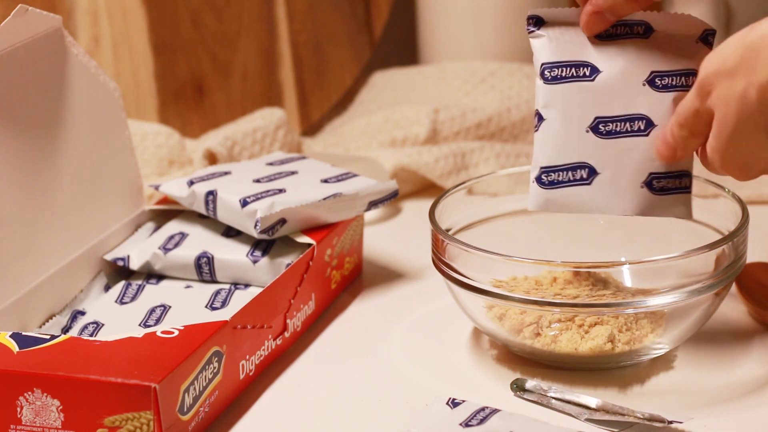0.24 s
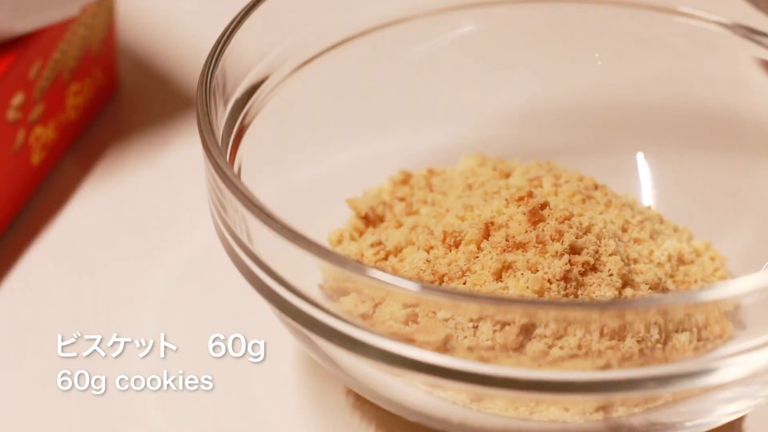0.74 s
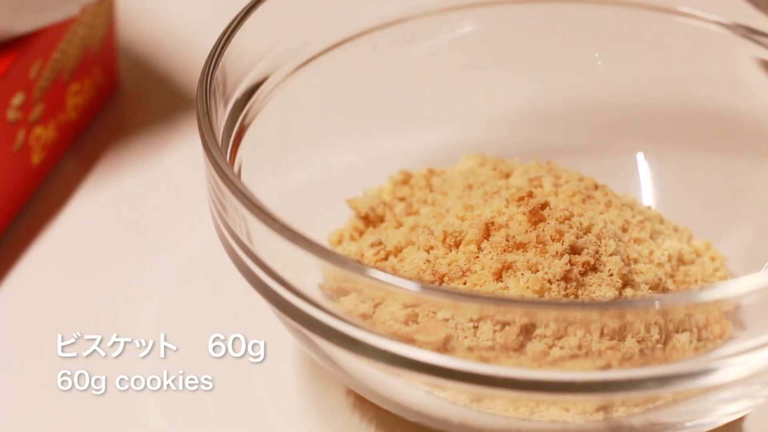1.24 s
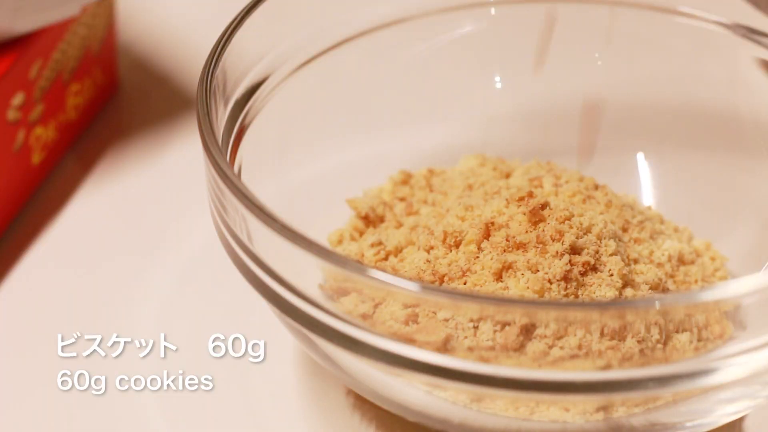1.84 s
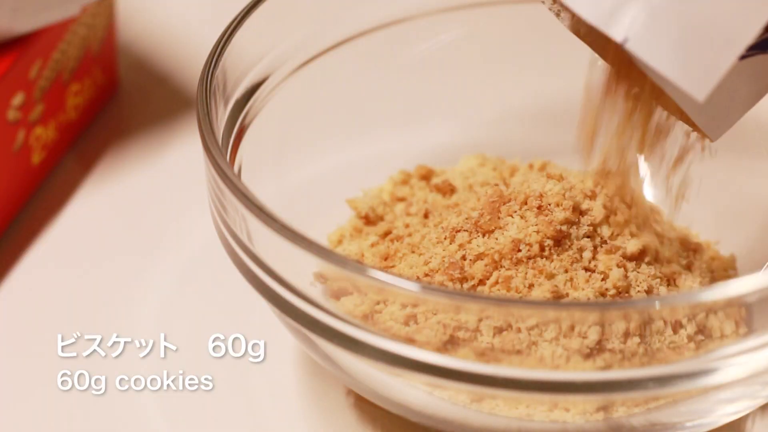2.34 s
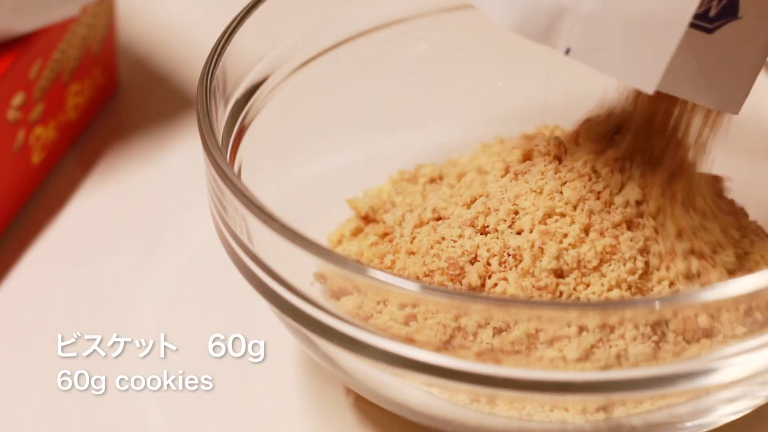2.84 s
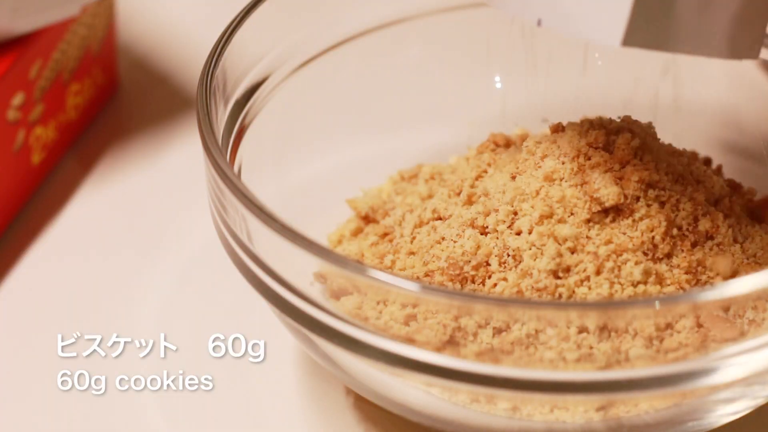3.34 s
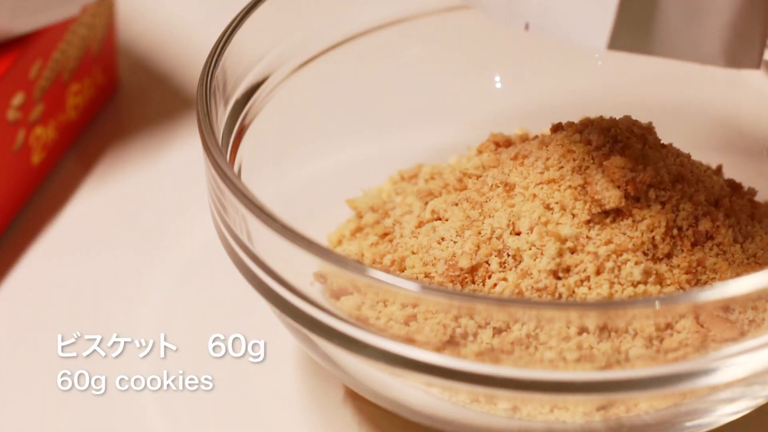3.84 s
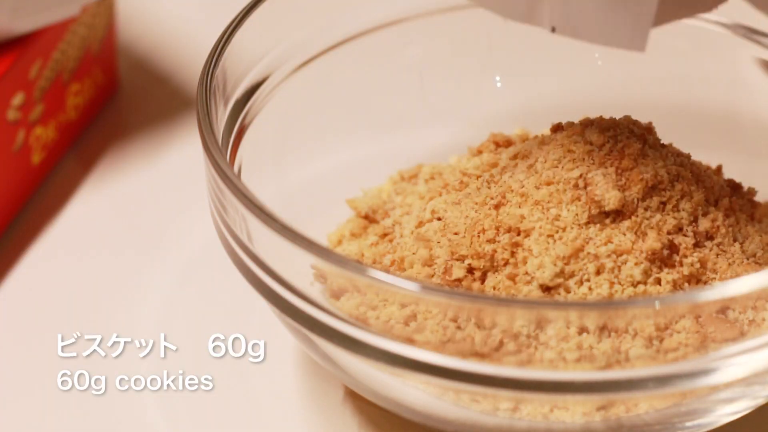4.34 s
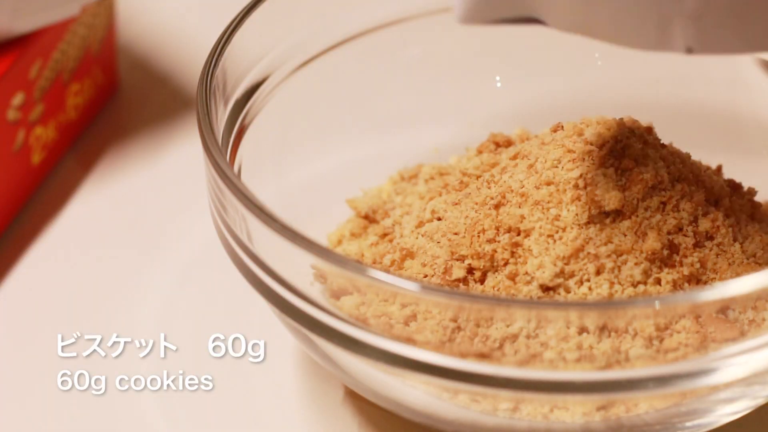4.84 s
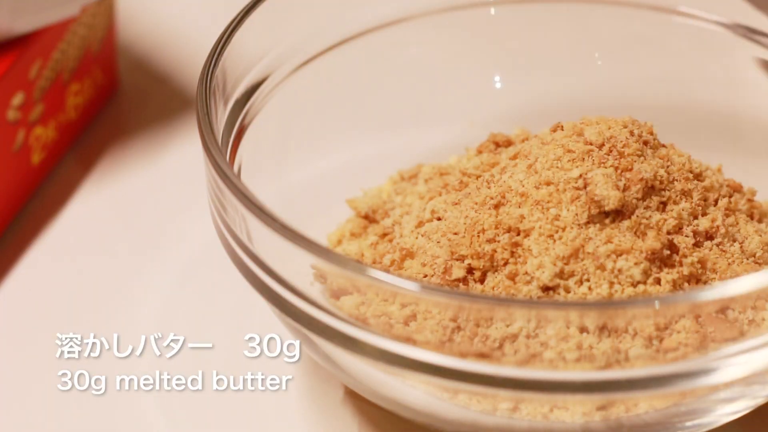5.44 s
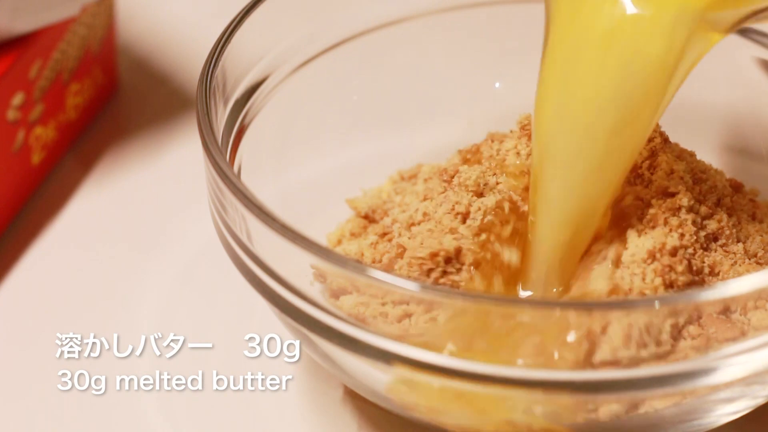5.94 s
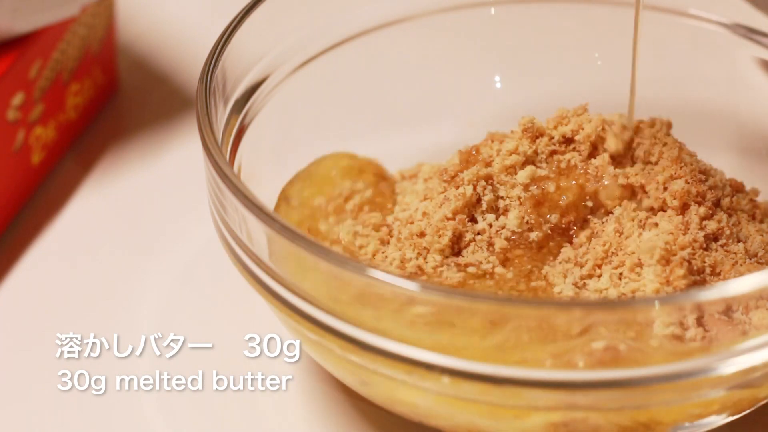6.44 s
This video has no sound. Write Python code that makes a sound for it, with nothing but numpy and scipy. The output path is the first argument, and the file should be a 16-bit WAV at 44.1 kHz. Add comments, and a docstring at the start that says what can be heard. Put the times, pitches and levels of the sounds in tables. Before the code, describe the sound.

Close up in a quiet kitchen, dry biscuit crumbs hiss out of a crinkling paper packet in short bursts, with sharp little snaps and dull finger taps. A stray crumb faintly pings a glass bowl before one fuller pour rises and fades. The packet is shaken again and gives a loud crunch, then goes still. Two tiny glass pings leave only faint room hiss and appliance hum in stereo.

```python
"""Biscuit crumbs pour from a crinkly paper packet into a glass bowl, close up and in stereo.
For two seconds the packet is shaken and squeezed: folds snap, fingers knock, crumbs slide in spurts.
A stray crumb pings the glass, then a long pour swells to its peak near 2.8 s and thins out.
More shakes follow, with a hard crunch near 4.7 s; the packet settles and two last crumbs ping at 6 s.
A quiet kitchen hisses and hums under it all and is left alone at the end."""
import sys
import numpy as np
from scipy import signal
from scipy.fft import rfft, irfft, next_fast_len
from scipy.io import wavfile
from scipy.ndimage import uniform_filter1d, map_coordinates

SR = 44100
rng = np.random.default_rng(int(sys.argv[2]) if len(sys.argv) > 2 else 0)


def dump_mix(stems):
    """Bounce the given channels to the path in sys.argv[1] as a 16-bit WAV at rate SR."""
    frames = np.atleast_2d(stems).T  # one column per channel
    limited = np.clip(frames, -1, 1)  # hard clip at full scale
    pcm = np.round(limited * 32767).astype(np.int16)
    wavfile.write(sys.argv[1], SR, pcm)


N = 295590

# each shake or squeeze lets crumbs slide: (peak time [s], crumb flow [dB], swell [s per 20 dB],
# fade [s per 20 dB], rustle over flow [dB], treble over flow [dB])
PACKET_SHAKES = [(0.03, -43, 0.5, 0.18, -10.5, -5.5), (0.145, -52, 0.4, 0.06, -10, -2.5),
                 (0.222, -47.5, .015, .1, -18, -3), (0.252, -46.5, .06, .015, -19, -3),
                 (0.334, -51.5, .015, 0.09, -3, -5), (0.374, -48, .09, .015, -14, -3),
                 (0.52, -62.5, .5, .2, -6, -8), (0.622, -37, 0.0123, 0.01, -8.5, 4),
                 (0.805, -53, .02, 0.22, -6, -5.5), (0.866, -41.5, .06, 0.06, -27, -6),
                 (0.966, -41, 0.12, 0.11, -23.5, -7), (1.06, -50, 0.08, 0.16, -13, -4.5),
                 (1.141, -38.5, 0.04, 0.11, -25, -16), (1.25, -52, 0.23, .08, -11.5, -5),
                 (1.365, -55, 0.1, 0.1, -13.5, -3.5), (1.514, -46, 0.11, 0.12, -6.5, -5),
                 (1.69, -61, 0.6, .4, -10, -6), (1.774, -49, .01, .14, -2.5, -1),
                 (1.92, -52, 0.28, .3, -15, -2), (2.015, -51, .3, 0.16, -4, -1),
                 (2.447, -54, .01, .07, 2, 2), (3.19, -51, 0.03, 0.09, -4, 1),
                 (3.262, -43, 0.04, .12, -10, -3), (3.541, -51, .025, 0.11, -1.5, -12),
                 (3.625, -42, 0.12, 0.145, -15, -2.5), (3.825, -56, 0.04, 0.02, -1.5, -6),
                 (3.855, -52.5, 0.04, .05, -2.5, -9), (3.922, -39.5, 0.0355, 0.1238, -11, -9.5),
                 (4.041, -38.5, 0.04, 0.085, -13.5, -8), (4.14, -51, .03, 0.1953, -9, -5),
                 (4.255, -43, .07, 0.0652, -17, -2), (4.304, -41.5, 0.11, 0.0245, -18.5, -4.5),
                 (4.406, -59, .15, 0.04, -11.5, -11), (4.666, -30, .006, .085, -7, -11),
                 (4.79, -54.5, 0.02, 0.12, -5.5, -7), (4.951, -37, .004, .055, -14, -6.5),
                 (5.03, -63, 0.1, 0.1, -7, -8), (5.15, -54, 0.12, 0.04, -18, -10),
                 (5.187, -62.5, 0.06, 0.04, 5, -12), (5.3, -54, .025, .1, -13, -6),
                 (5.335, -52, 0.07, .05, -12.5, -6.5), (5.396, -46, 0.06, .017, -16, -18),
                 (5.43, -70, 0.3, 0.04, -6, -8)]
# envelope of the long pour: (time [s], crumb flow [dB], rustle over flow [dB])
LONG_POUR = [(2.1, -70, -13), (2.243, -62, -9), (2.424, -53, -12.5), (2.514, -47.5, -16.5),
             (2.67, -38.5, -18), (2.834, -35.5, -13), (3.035, -39.5, -10), (3.129, -54.5, 2),
             (3.26, -51, -4.5), (3.514, -72, 5)]
# tone colour of sliding crumbs: (frequency [Hz], relative level [dB])
CRUMB_SPECTRUM = [(710, -33.5), (1200, -11), (1340, -22.5), (2180, -6), (2620, -9.5), (2980, -4.5),
                  (3590, -7.5), (4220, -0.5), (5970, -8.5), (9720, 5.5), (11600, -3.5), (13200, -4.5),
                  (16000, -19)]
# tone colour of rustling paper: (frequency [Hz], relative level [dB])
RUSTLE_SPECTRUM = [(120, -41), (230, -15.5), (460, -11.5), (680, -9), (870, -12.5), (1150, -4.5),
                   (1400, -10), (2200, -8), (4000, -9.5), (8000, -59.5)]
# stereo image of crumbs and paper: (frequency [Hz], left-right likeness [-1..1])
CLOSE_IMAGE = [(60, -0.27), (150, -0.24), (380, 0.22), (950, 0.79), (2380, 0.98), (5980, 0.8),
               (10000, 0.85), (15000, 0.3)]
# the big folds that give way: (time [s], panel peak [dB], panel pitch [Hz],
# air pocket over panel [dB], crisp edge over panel [dB], rattle t60 [s])
FOLD_SNAPS = [(0.0155, -23, 3980, -28, -14.5, .01), (0.1082, -46, 1450, 0, -6.5, 0.0048),
              (0.1154, -37, 4040, -10, -8.5, .0042), (0.139, -42, 4050, -27, 8.5, .012),
              (0.3316, -41, 3070, -1.5, -5, 0.01), (0.4344, -45.5, 4070, -25, 2.5, .014),
              (0.4782, -48.5, 4080, -6, 0, 0.013), (0.5134, -51.5, 4050, -13, 9.5, .0061),
              (0.6215, -24.5, 3800, -36, 0, 0.0094), (0.7926, -54, 1840, -30, 8, .0034),
              (0.8677, -43.5, 4324, -37, 9.5, .0054), (0.9652, -35.5, 4870, -30, -11, .015),
              (1.034, -35, 2310, -21, -14, 0.0065), (1.1339, -17, 4040, -38, -15, .006),
              (1.1874, -21.5, 3100, -24, -28, .002), (1.2724, -45.5, 1480, -28, -10.5, .0062),
              (1.3393, -38, 2905, -4.5, -6, 0.016), (1.4071, -46, 2250, -7, -8.5, 0.0046),
              (1.4175, -47, 1700, -6, -12, .005), (1.4945, -41, 2900, -15, -5, .005),
              (1.51, -33.5, 1650, -4, -6, .005), (1.5274, -33, 3740, -16, -15, .005),
              (1.5349, -41.5, 1710, -2, -13, .005), (1.5668, -39.5, 1500, 2.5, -8, .014),
              (1.7745, -39, 4584, 0, -15, 0.0062), (1.7984, -41, 4800, -6, -9, .0055),
              (1.8198, -33.5, 4180, -19, -17.5, .0054), (1.8801, -41.5, 4490, -18, -3, .0073),
              (1.9749, -37.5, 2170, -17, 0, .005), (2.012, -42, 1570, -9.5, -2.5, .0045),
              (2.022, -42.5, 2600, -0.5, -5.5, 0.0096), (2.0553, -31, 3370, -24, -14, 0.0091),
              (2.3712, -52, 4190, 1.5, -9, .0081), (2.451, -37, 3100, -7, -10, 0.017),
              (2.7544, -43, 3030, 6, -11, .0046), (2.8328, -25.5, 3160, -16, -6, .0034),
              (2.8704, -28.5, 4270, -8, -6.5, 0.0076), (2.92, -28.5, 4200, -36.5, -21, .0019),
              (3.0939, -27, 3180, -13, -17, .004), (3.117, -31, 2210, -19, -25, 0.0069),
              (3.1383, -40.5, 2270, -18, -11.5, .005), (3.1845, -24, 3970, -15.5, -16.5, 0.0043),
              (3.21, -35.5, 4180, -30, -14, 0.015), (3.2515, -25, 3630, -8, 11, .005),
              (3.2954, -30.5, 2130, -38, -27, 0.003), (3.3318, -33.5, 4170, -16.5, -6.5, 0.0051),
              (3.4079, -37, 4010, -37, -21, .0082), (3.4902, -41.5, 1910, -14, -25, .0031),
              (3.534, -24, 2100, -18.5, -3, .0017), (3.5505, -25.5, 3050, -31.5, -13, 0.0094),
              (3.61, -31, 3360, -40, -4.5, 0.01), (3.8228, -36, 1910, -10, -4, .0041),
              (3.8506, -26, 2230, -38, -6.5, 0.013), (3.917, -27.5, 2380, -21, 2.5, .015),
              (3.9421, -33.5, 2200, -40, -23, 0.0071), (3.994, -33.5, 2250, -22, 2.5, 0.0064),
              (4.0352, -28.5, 2520, -10.5, -7, .0078), (4.098, -43.5, 1580, -3.5, -2, .0046),
              (4.1343, -35.5, 3900, -10, -2.5, .0079), (4.2457, -36.5, 4770, -20, -3.5, 0.0079),
              (4.2902, -37, 4680, -13, -15, .005), (4.366, -52, 4410, -21, 5, .005),
              (4.4007, -46, 3040, -24, -21, .0046), (4.6638, -25, 4030, -21, -8.5, 0.012),
              (4.6756, -18, 2370, -12, -11, .005), (4.6795, -17, 4360, -22, 0, 0.016),
              (4.6914, -25.5, 2550, -16, 6.5, 0.0087), (4.7167, -27, 3960, -23, -19.5, 0.0032),
              (4.7619, -44, 4010, -15, 10, .0058), (4.785, -47, 2210, -1.5, -10, .0083),
              (4.8314, -43, 2980, -22, -26.5, .005), (4.9546, -29.5, 3800, -25.5, -4, .0069),
              (4.9672, -23, 4300, -21.5, -1.5, 0.011), (5.2383, -52, 2400, -5.5, -26, 0.0071),
              (5.3394, -47, 4040, -10.5, -14, .013), (5.3936, -43, 2750, -14.5, -22, .0097),
              (5.4944, -55, 3900, -15, -12, .005), (6.1494, -64, 4420, -20, 6, 0.0057)]
# the crisp edge of every snap: (frequency [Hz], relative level [dB], t60 [s])
CRISP_MODES = [(8780, 10, 0.0026), (10130, 0.5, 0.0036)]
# how the packet is held: (time [s], air pocket pitch [Hz], left over right [dB])
PACKET_GRIP = [(0.1, 785, -1), (0.33, 1160, 1.5), (0.62, 1100, 1), (0.9, 1390, 5), (1.35, 1370, 1),
               (1.5, 1145, -1.5), (3.0, 1150, -2), (3.4, 1170, -2), (3.85, 850, 0), (4.05, 1113, -0.5),
               (4.68, 857, 0), (4.8, 480, 2.5), (4.97, 705, 0), (5.2, 930, -3.5)]
# fingers tap and press the packet: (time [s], peak level [dB], pitch [Hz])
FINGER_KNOCKS = [(0.014, -48, 595), (0.104, -47, 600), (0.258, -53, 580), (0.329, -50, 547),
                 (0.396, -56, 517), (1.507, -47, 676), (1.566, -48.5, 595), (1.777, -49, 704),
                 (2.449, -51.5, 490), (2.829, -48.5, 500), (3.089, -42.5, 390), (3.329, -51, 510),
                 (3.917, -52, 503), (4.036, -50.5, 400), (4.673, -34, 450), (4.683, -44, 250),
                 (4.955, -48, 450), (4.968, -47, 470), (5.187, -52.5, 600)]
# crumbs that strike bare glass: (time [s], low mode gain [dB], high mode gain [dB])
GLASS_PINGS = [(2.069, -70, -62), (3.776, -90.5, -64), (5.955, -94.5, -71.5), (5.977, -68, -74)]
# the ring of the glass bowl: (frequency [Hz], relative level [dB], t60 [s])
BOWL_MODES = [(2500, -1.5, 0.4), (4390, -3, 0.5), (9028, -7, .25), (12080, -19, .2), (12800, 2, 0.12),
              (13500, -7, 0.33), (14300, -8, 0.22)]
# reverb decay off the kitchen walls: (frequency [Hz], t60 [s])
WALL_DECAY = [(300, 0.45), (12000, 0.027)]
# tone colour of the room hiss: (frequency [Hz], relative level [dB])
ROOM_SPECTRUM = [(12, -36), (28, -14), (50, -15.5), (66, -12), (85, -17), (110, -13), (170, -17),
                 (400, -25.5), (825, -29.5), (2750, -33.5), (7000, -37), (8500, -33), (12000, -38),
                 (16000, -38.5)]
# stereo image of the room hiss: (frequency [Hz], left-right likeness [-1..1])
ROOM_IMAGE = [(30, .6), (150, .5), (400, 0.29), (3000, 0.25), (15000, 0.1)]
# appliance hum and whine: (frequency [Hz], left level [dB], right level [dB], left phase lead [rad])
HUM_TONES = [(49.7, -82, -75, .3), (90, -75, -56.5, 1.7), (122, -82, -81, .3), (8465, -98, -96, .3)]


def pouring(flow, bright, rustle):
    """Crumbs hiss as they slide; the paper under them rustles lower and in coarser clumps."""
    # a thin trickle lets single crumbs stand out
    sparse_db = np.interp(20 * np.log10(flow + 1e-12), [-55, -40], [2.9, 1.7])
    fine = grains(clump_db=2, clumps_per_s=250, spike_db=sparse_db, patch_db=2.5)
    fine /= np.sqrt(uniform_filter1d(np.mean(fine ** 2, axis=0), size=SR // 5))  # ride the level flat
    hiss = spread(fine * amp(1.1 * wobble(30) + 1.5 * wobble(16)), CRUMB_SPECTRUM, CLOSE_IMAGE)
    treble = filtered(hiss, lambda hz: 1 / (1 + (6000 / (hz + 1)) ** 8))
    coarse = grains(clump_db=3, clumps_per_s=150, spike_db=2.2, patch_db=3) * amp(1.2 * wobble(25))
    paper = spread(coarse, RUSTLE_SPECTRUM, CLOSE_IMAGE)
    return flow * (hiss - treble) + bright * treble + rustle * paper


def grains(clump_db, clumps_per_s, spike_db, patch_db):
    """A dense hail of tiny impacts in clumps; a few are bigger than the rest."""
    spikes = np.minimum(rng.exponential(size=N), 6)
    size = amp(spike_db * spikes + clump_db * wobble(clumps_per_s))
    return size * patchy(rng.standard_normal((2, N)), patch_db)


def handling(pour_treble_db=-4):
    """Envelopes of crumb flow, its treble and the rustle: shakes swell and fade over the long pour."""
    t = np.arange(N) / SR
    times, flow_db, rustle_db = np.transpose(LONG_POUR)
    flow_db = np.interp(t, times, flow_db, left=-200, right=-200)
    rustle_db = np.interp(t, times, rustle_db)
    power = amp([flow_db, flow_db + pour_treble_db, flow_db + rustle_db]) ** 2
    for peak_s, db, swell, fade, paper_db, treble_db in PACKET_SHAKES:
        shape_db = db - 20 * np.maximum((peak_s - t) / swell, (t - peak_s) / fade)
        power += amp(shape_db + np.array([[0], [treble_db], [paper_db]])) ** 2
    return np.sqrt(power)


def snaps(folds, pan_scatter_db=1.3):
    """Each fold breaks with a jolt and a short rattle that ring its panel, air pocket and crisp edge."""
    sound, t = np.zeros((2, N + SR)), np.arange(SR // 40) / SR
    grip_s, grip_hz, grip_db = np.transpose(PACKET_GRIP)
    for start, db, panel_hz, pocket_db, crisp_db, t60 in folds:
        pocket_hz = np.interp(start, grip_s, grip_hz)
        pan_db = np.interp(start, grip_s, grip_db) + pan_scatter_db * rng.normal()
        jolt = .35 * amp(-60 * t / np.clip(t60, .001, .03)) * rng.standard_normal((3, len(t)))
        jolt[:, 0] = 1  # the attack, ahead of the rattle
        panel = [(panel_hz, 0, 10 / panel_hz), (1.4 * panel_hz, -12, 5 / panel_hz),
                 (0.78 * panel_hz, 0, 9 / panel_hz)]
        pocket = [(pocket_hz, 0, 14 / pocket_hz)]
        bodies = [ringing(modes, t) * (1 - np.exp(-3 * t * modes[0][0]))
                  for modes in (panel, pocket, CRISP_MODES)]
        layers = np.pad(signal.fftconvolve(jolt, bodies, axes=1), ((0, 0), (4, 0)))
        layers[::2, 2:] = np.diff(layers[::2], 2)  # a small thin panel radiates no bass
        layers[0] = uniform_filter1d(layers[0], size=4)  # paper gives way softly: no hard top
        layers[2] = uniform_filter1d(layers[2], size=2)
        layers /= np.abs(layers).max(axis=1, keepdims=True)
        layers *= amp(db + np.array([[0], [pocket_db], [crisp_db]]))
        snap = layers.sum(axis=0) * amp([[pan_db / 2], [-pan_db / 2]])
        sound[:, round(start * SR):][:, :snap.shape[1]] += snap
    return sound[:, :N]


def crinkles(rustle, per_s=40, over_rustle_db=8, scatter_db=3):
    """Small folds give way at random, as loud as the paper is busy: rows like FOLD_SNAPS."""
    panel_hz, pocket_db, crisp_db, t60 = 2820, -18, -7, .004
    scatter = rng.standard_normal((round(per_s * N / SR), 4))
    onsets = rng.integers(N, size=len(scatter))
    peaks_db = 20 * np.log10(rustle[onsets] + 1e-12) + over_rustle_db + scatter_db * scatter[:, 0]
    return [(onset / SR, db, panel_hz * np.exp(.3 * pitch),
             pocket_db + 5 * pocket, crisp_db + 7 * crisp, t60)
            for onset, db, (pitch, pocket, crisp) in zip(onsets, peaks_db, scatter[:, 1:])]


def knocks(decay_cycles=10, attack_s=0.0021, overtone_ratio=1.455, overtone_db=-5):
    """A soft fingertip pushes the crumb-filled packet: a dull knock of two heavily damped modes."""
    sound, t = np.zeros(N + SR), np.arange(SR // 20) / SR
    attack = 1 - np.exp(-(t / attack_s) ** 2)
    for start, db, hz in FINGER_KNOCKS:
        modes = [(hz, 0, decay_cycles / hz), (overtone_ratio * hz, overtone_db, decay_cycles / hz)]
        body = np.diff(ringing(modes, t) * attack)  # too small to radiate bass
        sound[round(start * SR):][:len(body)] += amp(db) * body / np.abs(body).max()
    return sound[:N]


def bowl(split_hz=9500, attack_s=0.0011):
    """A crumb on bare glass rings the bowl softly; where it lands sets low against high modes."""
    glass, t = np.zeros(N + SR), np.arange(SR // 3) / SR
    for start, low_db, high_db in GLASS_PINGS:
        struck = [(hz, db + (low_db if hz < split_hz else high_db) + rng.normal(0, 2), t60)
                  for hz, db, t60 in BOWL_MODES]
        glass[round(start * SR):][:len(t)] += ringing(struck, t) * (1 - np.exp(-t / attack_s))
    return glass[:N] * amp([[-1], [1]])  # a touch to the right


def walls(x):
    """The walls answer with a short stereo reverb whose highs die first."""
    hz, t, noise = signal.stft(rng.standard_normal((2, SR // 3)), SR, nperseg=256)
    tail = signal.istft(noise * amp(-60 * t / along(WALL_DECAY, hz)[:, None]), SR, nperseg=256)[1]
    predelayed = np.pad(x, (300, 0))[None]
    return signal.fftconvolve(predelayed, tail / np.linalg.norm(tail[0]), axes=1)[:, :N]


def kitchen():
    """Room tone: steady hiss, a wavering appliance hum mostly on the right, and a thin faint whine."""
    hiss_gain = amp(-70 + 0.35 * wobble(0.99))
    sound = hiss_gain * spread(patchy(rng.standard_normal((2, N)), 2.1), ROOM_SPECTRUM, ROOM_IMAGE)
    for hz, left_db, right_db, lead in HUM_TONES:
        phase = 2 * np.pi * np.cumsum(hz + .4 * wobble(5.2)) / SR
        tone = np.sqrt(2) * np.sin(phase + np.array([[lead], [0]]))
        sound += amp(np.array([[left_db], [right_db]]) + 0.62 * wobble(8)) * tone
    return sound


def ringing(modes, t):
    """Decaying sines, one per mode: (frequency [Hz], level [dB], t60 [s])."""
    return sum(amp(db - 60 * t / t60) * np.sin(2 * np.pi * hz * t) for hz, db, t60 in modes)


def patchy(x, depth_db):
    """Random gain patches in time and frequency: no two moments favour the same pitches."""
    spectra = signal.stft(x, nperseg=1024)[2]
    patches = uniform_filter1d(rng.standard_normal(spectra.shape[-2:]), size=3, axis=0)
    patches = uniform_filter1d(patches, size=6, axis=1)
    return signal.istft(spectra * amp(depth_db * unit(patches)), nperseg=1024)[1][..., :N]


def spread(pair, spectrum, image):
    """Two noises, EQ'd and mixed as mid and side to a stereo image, at rms 1."""
    def response(hz):
        width = np.arccos(np.clip(along(image, hz), -1, 1)) / 2
        return amp(along(spectrum, hz)) * [np.cos(width), np.sin(width)]
    mid, side = filtered(pair, response)
    return unit(np.array([mid + side, mid - side]))


def filtered(x, response):
    """EQ x with a gain given as a function of frequency."""
    size = next_fast_len(N + SR // 2)
    return irfft(rfft(x, size) * response(np.fft.rfftfreq(size, 1 / SR)), size)[..., :N]


def wobble(rate):
    """Smooth random modulation, rate knots a second."""
    return map_coordinates(rng.standard_normal(int(N * rate / SR) + 4), [np.arange(N) * rate / SR])


def along(points, hz):
    """Read a (frequency [Hz], value) curve on a log axis."""
    freqs, values = np.transpose(points)
    return np.interp(np.log(hz + 1), np.log(freqs + 1), values)


def amp(db):
    """Gain of a level in dB."""
    return 10 ** (np.asarray(db) / 20)


def unit(x):
    """x at rms 1."""
    return x / np.sqrt(np.mean(x ** 2) + 1e-20)


def scene():
    """Mix crumbs, packet, bowl and room tone; only the snaps and knocks feed the reverb."""
    flow, bright, rustle = handling()
    packet = snaps(FOLD_SNAPS + crinkles(rustle)) + knocks()
    pour = pouring(flow, bright, rustle)
    reverb = amp(-21.0) * walls(packet.mean(axis=0))
    return pour + packet + reverb + bowl() + kitchen()


def record(dry):
    """A brick-wall high cut at 15.8 kHz over the whole mix."""
    return filtered(dry, lambda hz: hz < 15800)


dry = scene()
out = record(dry)
dump_mix(out)
```